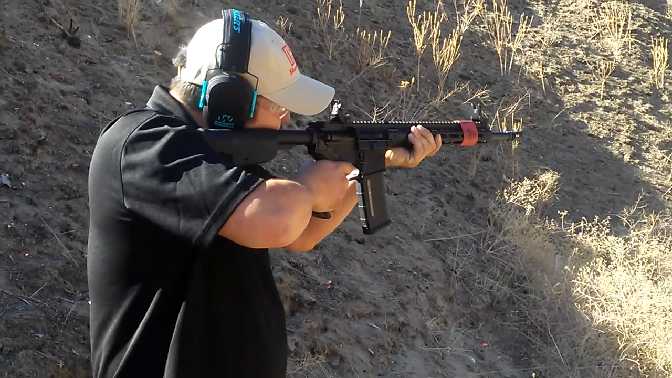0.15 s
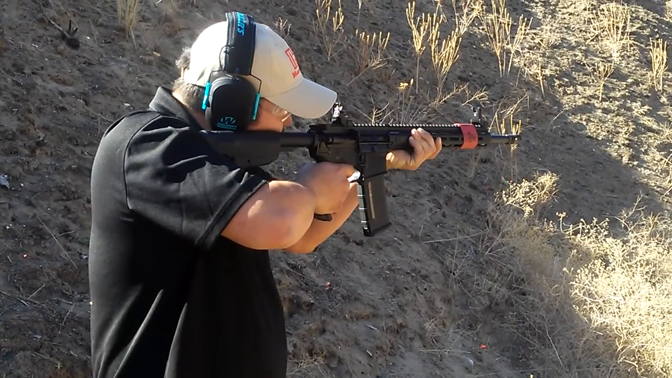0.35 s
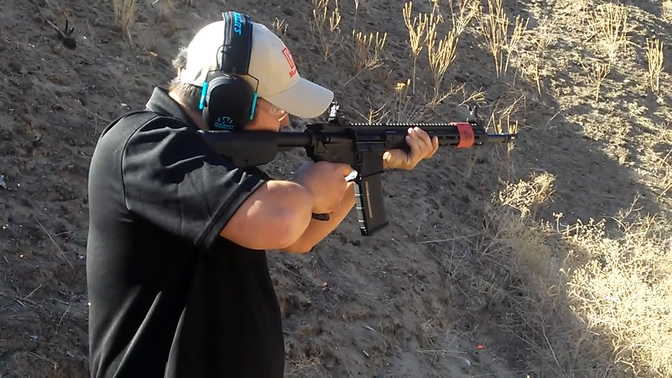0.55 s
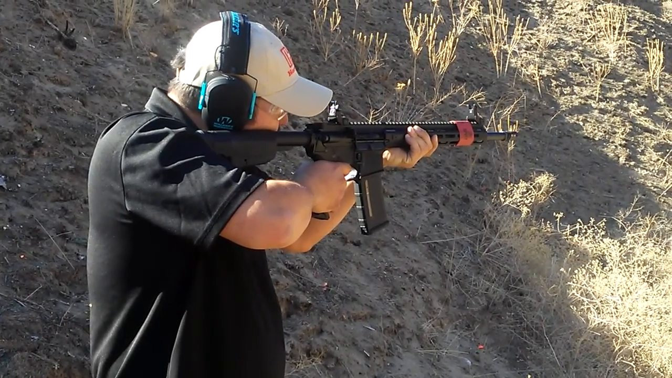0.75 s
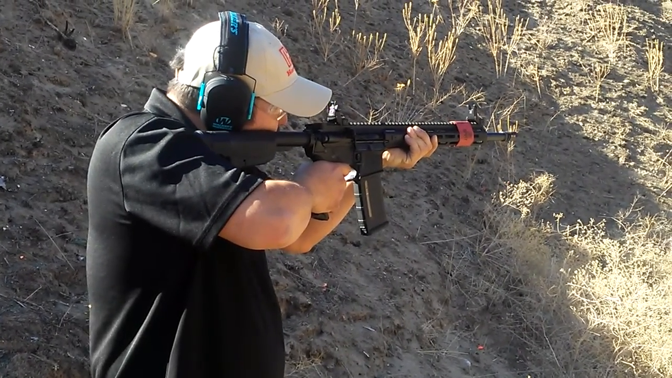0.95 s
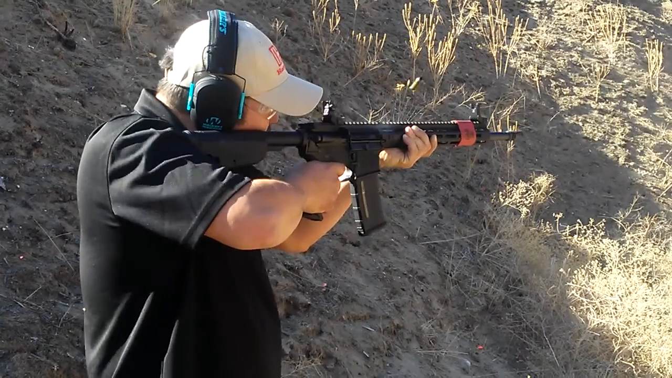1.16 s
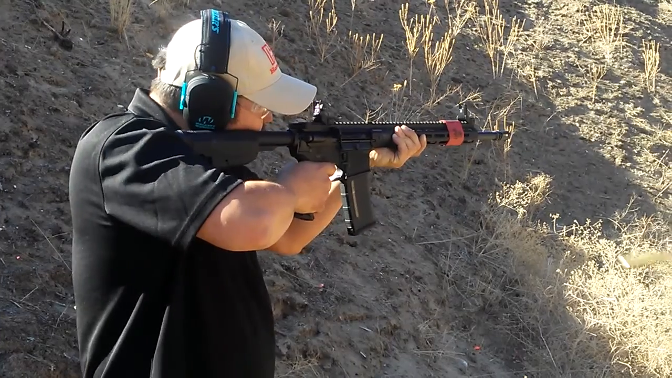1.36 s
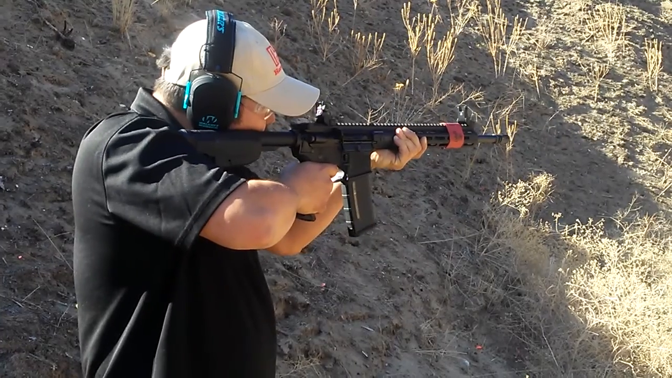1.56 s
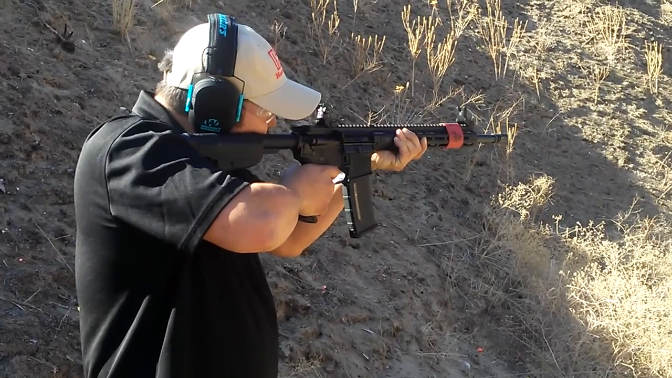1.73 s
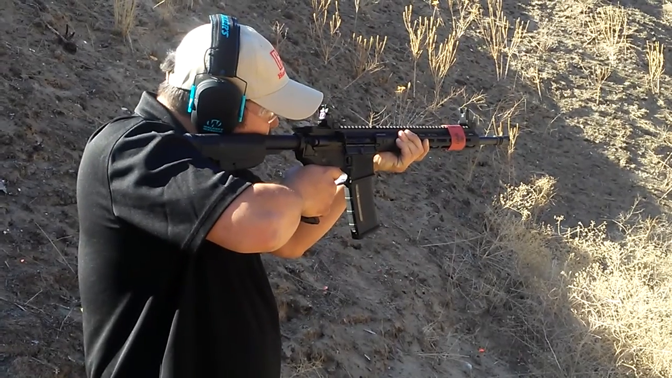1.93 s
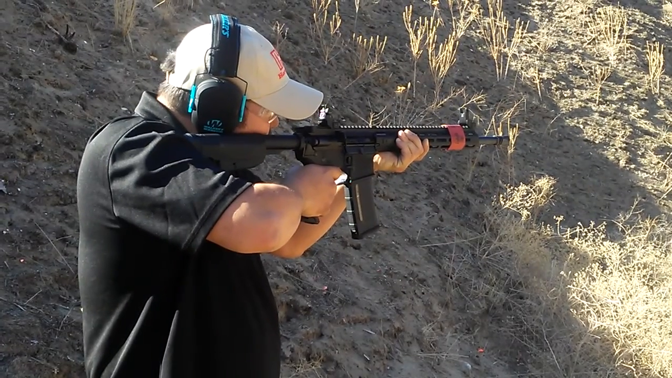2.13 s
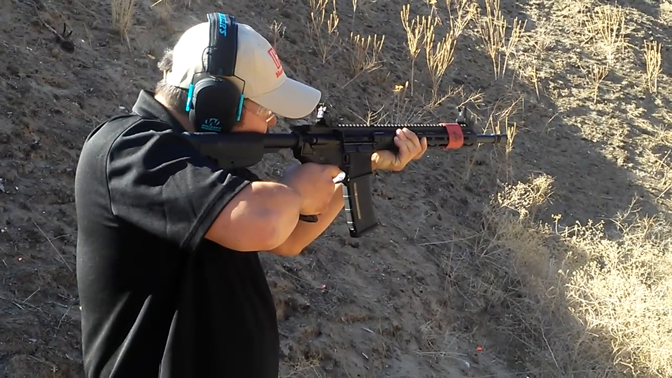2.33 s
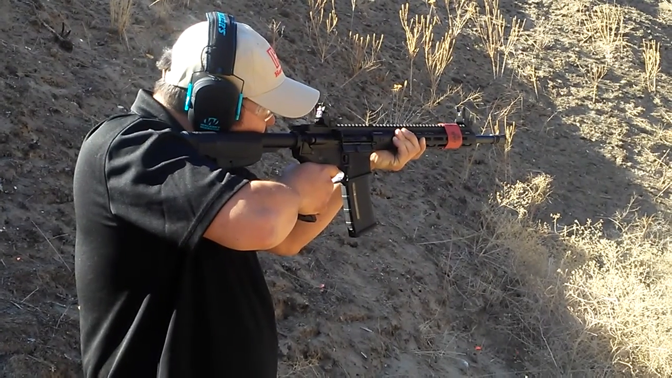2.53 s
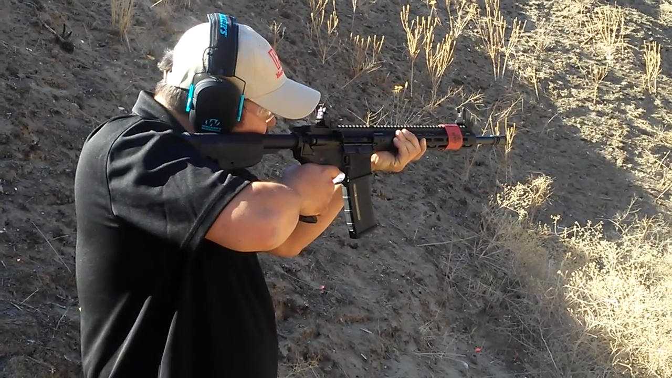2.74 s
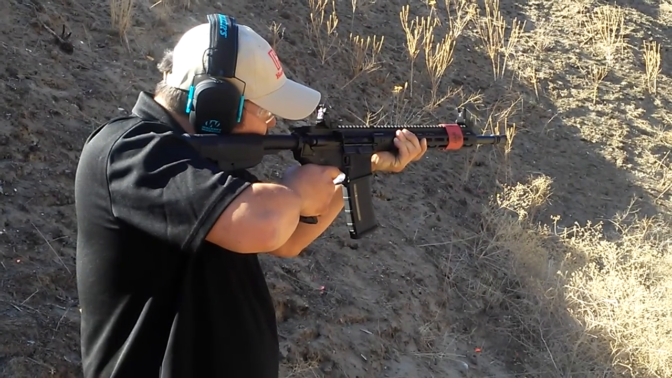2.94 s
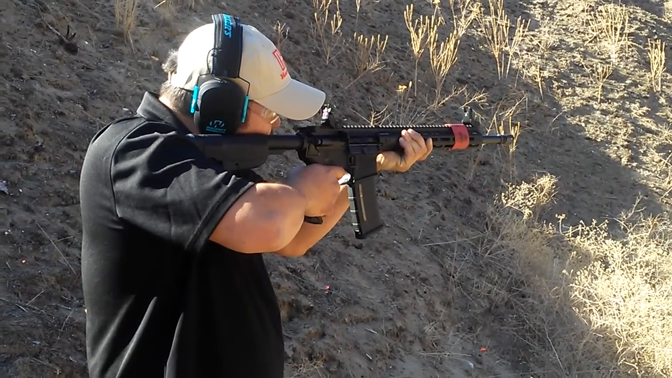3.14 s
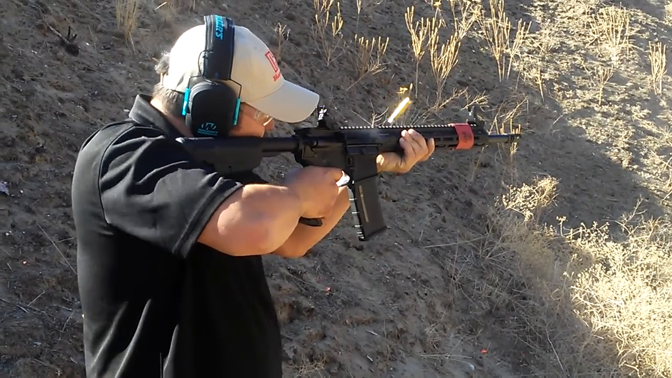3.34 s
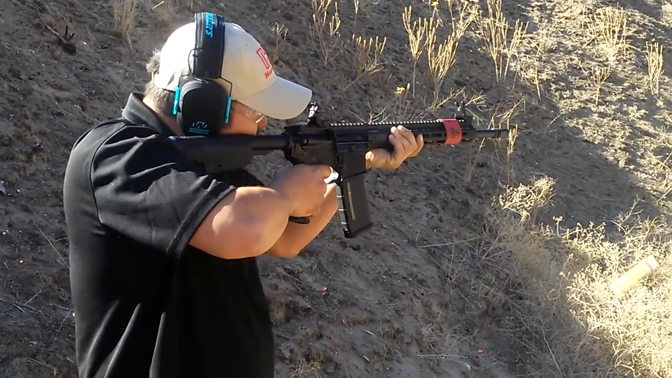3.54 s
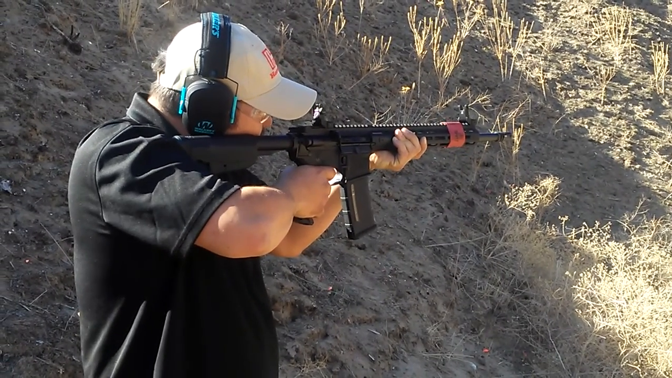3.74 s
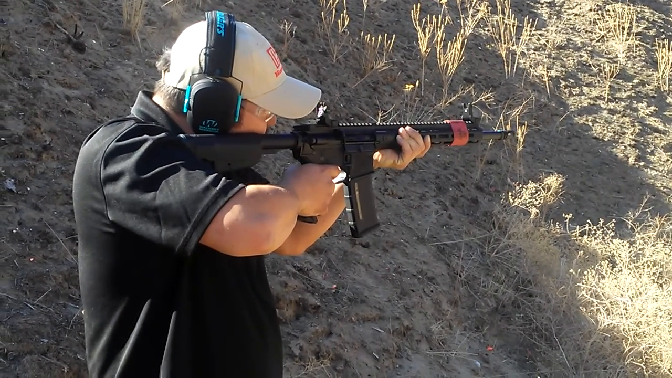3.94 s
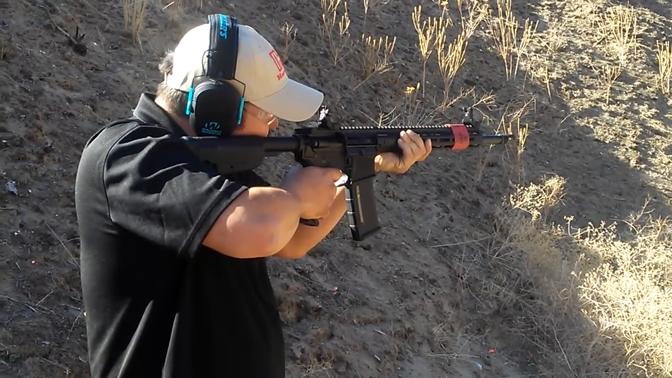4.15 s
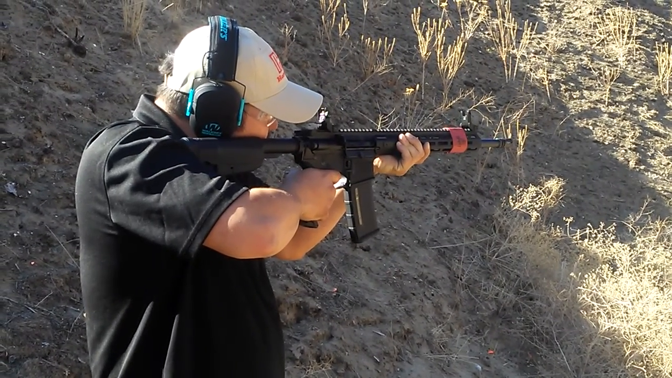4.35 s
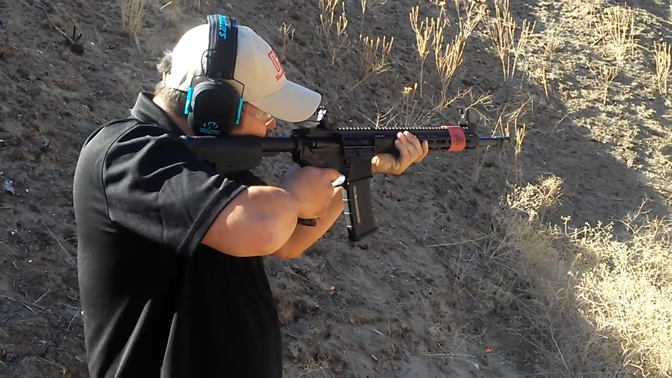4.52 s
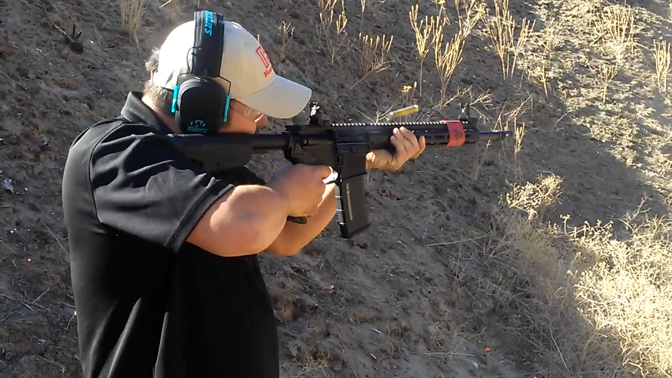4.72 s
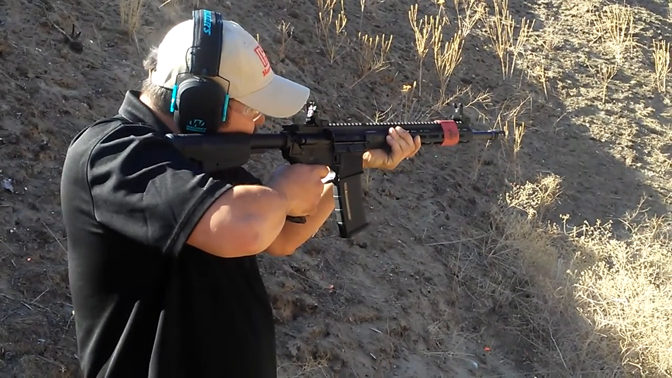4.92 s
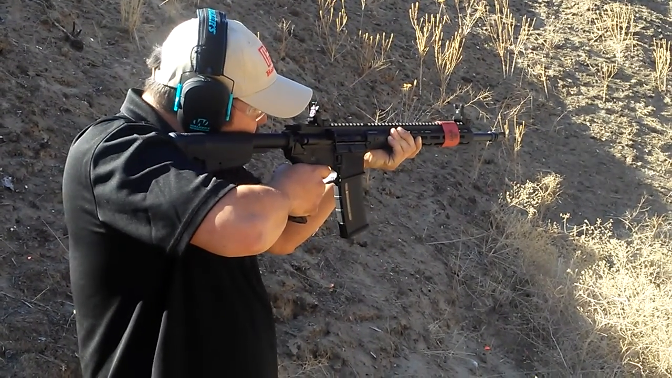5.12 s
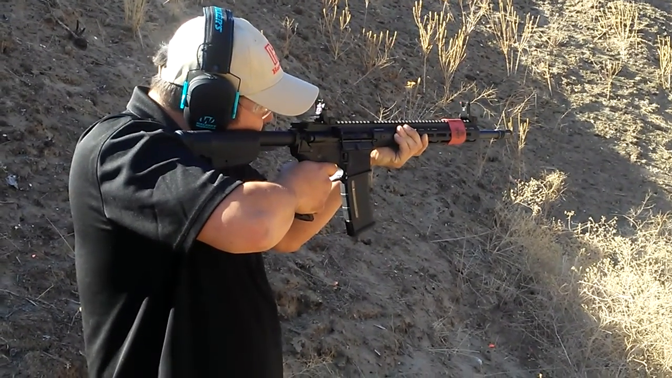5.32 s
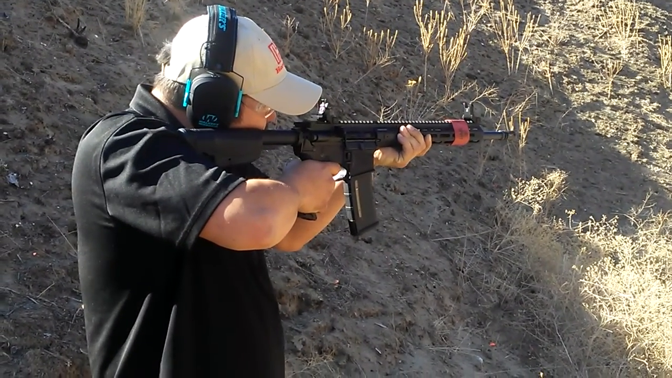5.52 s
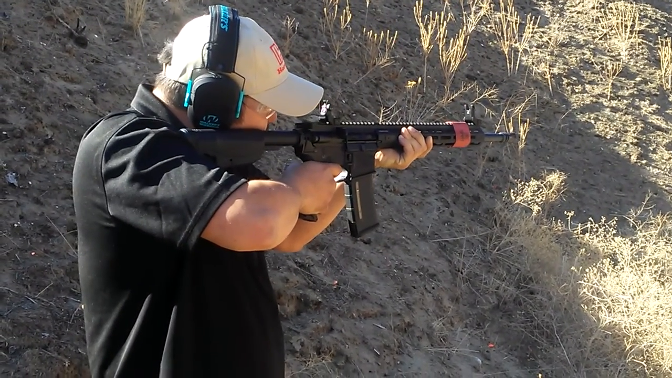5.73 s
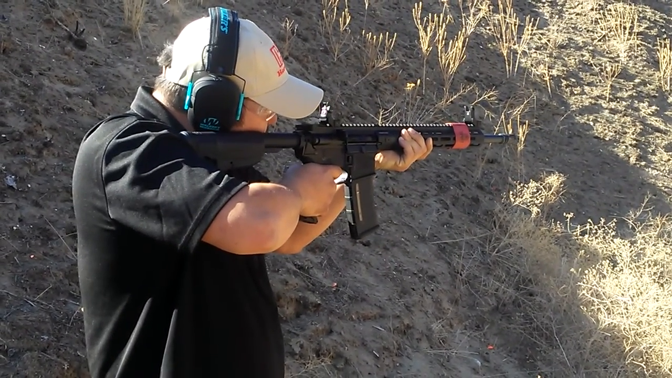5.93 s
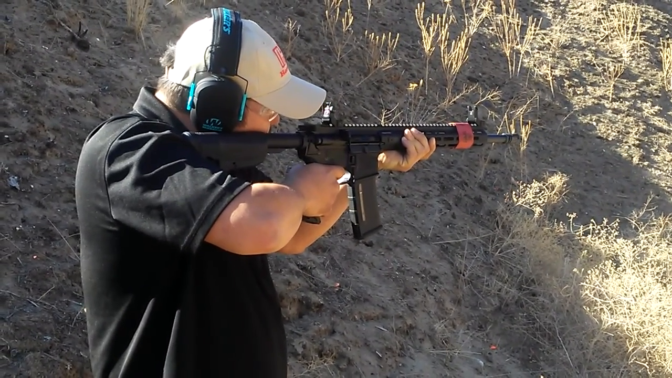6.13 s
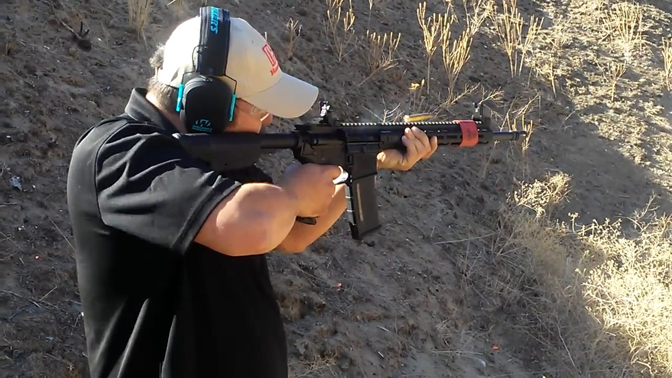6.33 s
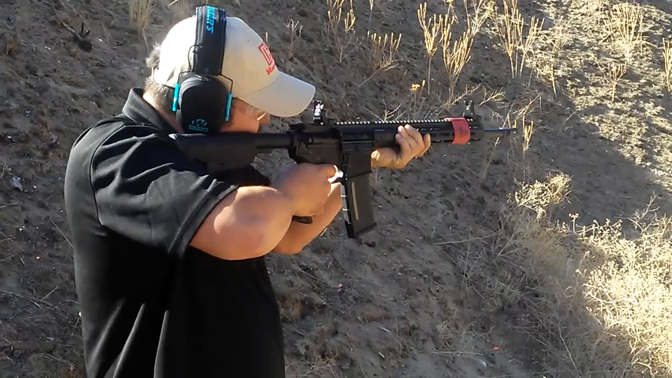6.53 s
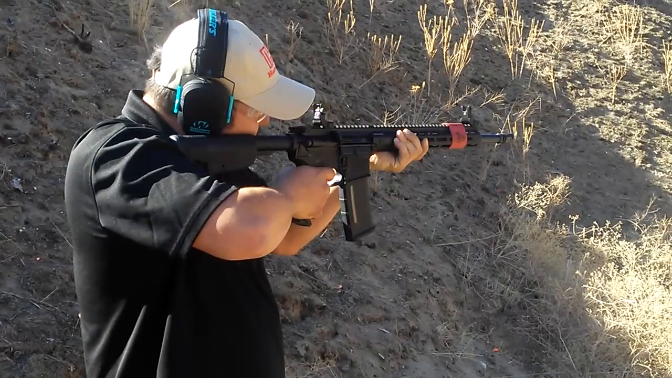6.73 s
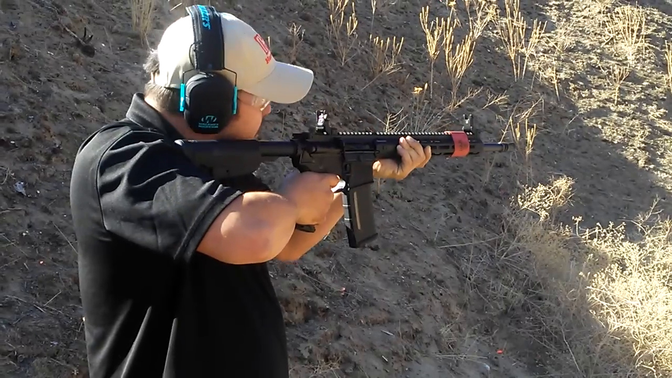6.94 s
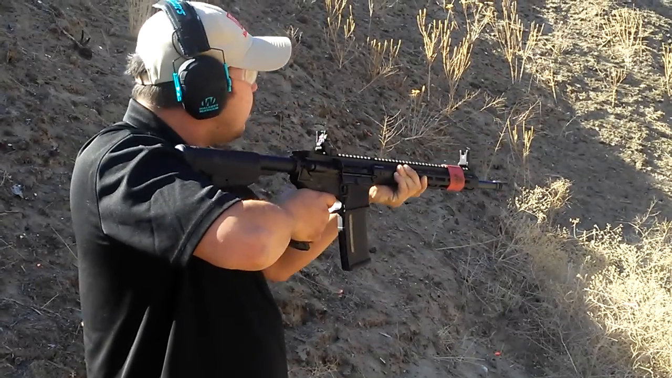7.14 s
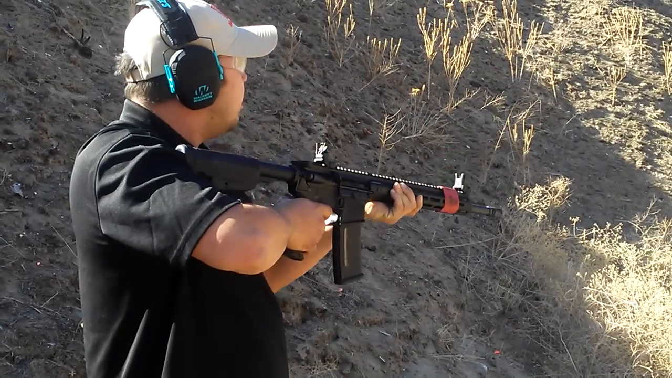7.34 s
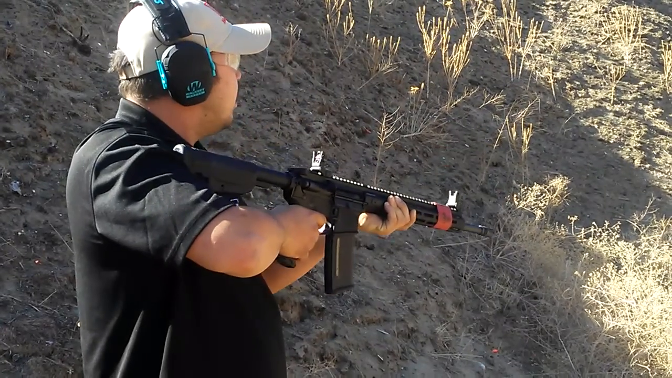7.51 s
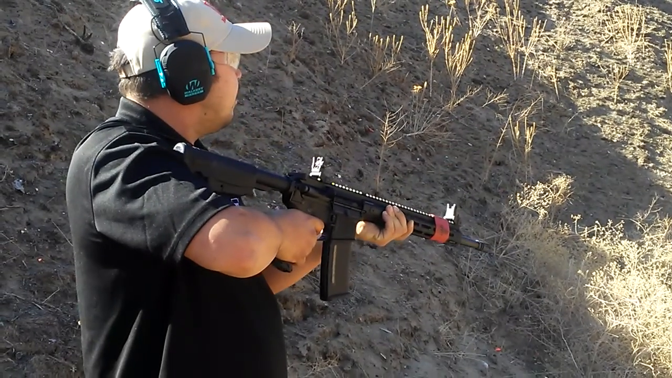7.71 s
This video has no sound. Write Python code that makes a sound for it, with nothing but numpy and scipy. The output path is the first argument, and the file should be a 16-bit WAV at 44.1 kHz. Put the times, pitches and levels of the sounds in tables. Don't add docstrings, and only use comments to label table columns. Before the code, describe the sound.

A close, small microphone on a dry outdoor range picks up hiss, low breeze and the fading far roll of an earlier shot. At 1.1 s a rifle fires: a hard, distorted blast, rapid slaps from dirt banks, a hollow wash fading within about a second, then a dull hillside return. A case taps dirt at 1.8 s with a tiny high ring. Wind thumps the microphone heavily around 2.2-2.5 s, with weaker buffets until 3.2 s. The second shot comes at 3.3 s, a hollow gear knock at 3.7 s, and case taps and rings at 4.0-4.25 s. The third shot, at 4.65 s, has a slight mechanical tick just before it; a dull case thud follows at 5.3 s. The last shot cracks at 6.3 s, with a knock at 6.6 s, a dirt tap at 6.95 s, soft cloth swishes at 7.1-7.3 s, and a brighter distant roll fading under breeze and hiss.

```python
import sys
import numpy as np
from scipy import signal
from scipy.fft import rfft, irfft, next_fast_len
from scipy.io import wavfile
from scipy.ndimage import uniform_filter1d, map_coordinates

SR = 44100
rng = np.random.default_rng(int(sys.argv[2]) if len(sys.argv) > 2 else 0)


def rack_gain(trim_db):
    fader = np.asarray(trim_db, float)
    return 10 ** (fader / 20)


def generate_wav(sig):
    pcm = np.round(np.clip(np.atleast_2d(sig).T, -1, 1) * 32767).astype(np.int16)
    wavfile.write(sys.argv[1], SR, pcm)


N = 342651

# (time [s], peak [dB], hammer tick level [dB])
SHOTS = [
    (1.114, 3, -26.5),
    (3.334, 3, -26),
    (4.653, 3.5, -18),
    (6.275, 4, -16),
]


def unit(x):
    return x / np.sqrt(np.mean(x ** 2) + 1e-20)


def along(points, hz):
    f, v = np.transpose(points)
    return np.interp(np.log(hz + 1), np.log(f + 1), v)


def noise(spectrum, count=N):
    m = next_fast_len(count + 8192)
    hz = np.fft.rfftfreq(m, 1 / SR)
    coloured = rfft(rng.standard_normal(m)) * rack_gain(along(spectrum, hz))
    return unit(irfft(coloured, m)[:count])


def ring(modes, t):
    return sum(rack_gain(db - 60 * t / t60) * np.sin(2 * np.pi * hz * t) for hz, db, t60 in modes)


def add(x, s, sound):
    part = x[round(s * SR):][:len(sound)]
    part += sound[:len(part)]


def lumps(shape, depth_db):
    field = uniform_filter1d(rng.standard_normal(shape), size=7, axis=0)
    field = uniform_filter1d(field, size=9, axis=1)
    return depth_db * unit(field)


def fired():
    return [-1.418] + [s for s, *_ in SHOTS]


def gate():
    # (start [s], end [s], share opened [0 to 1])
    stir = (2.97, 3.24, .4)
    t = np.arange(N) / SR
    held = np.any([(t > s + .35) & (t < s + 1.801) for s in fired()], axis=0)
    held = held | (t > SHOTS[1][0])
    start, end, share = stir
    return np.maximum(held, share * (t > start) * (t < end))


def hiss():
    # (frequency [Hz], level per Hz [dB])
    hiss_colour = [(120, -32.5), (200, 0), (245, 0), (458, -9), (560, -15), (4820, -12.5), (7490, -17.5),
                   (14500, -15.5), (16200, -22.5)]
    return rack_gain(-72.5 + 7 * gate()) * noise(hiss_colour)


def wind():
    # (time [s], level [dB])
    low_level = [
        [(0, -62), (.19, -55), (.52, -67), (.96, -72.5), (1.5, -47), (2.1, -46.5), (2.35, -24), (2.51, -50),
         (2.8, -40), (2.93, -56), (3.04, -47), (3.32, -62), (4.2, -53.5), (4.55, -48), (5.7, -48), (6.2, -54.5),
         (7.1, -43), (7.77, -56)],
    ]
    # (frequency [Hz], level per Hz [dB])
    rumble = [(15, -40.5), (30, -16), (55, 0), (90, -3.5), (120, -10), (200, -17), (400, -29.5), (880, -92)]
    # (time [s], length [s], peak [dB], eddy pitch [Hz], fade [dB per eddy])
    gusts = [(0.18, 0.056, -43, 60, -8), (.195, .05, -43, 55, -4), (0.281, .08, -47.5, 56, 3),
             (0.668, .01, -52, 51, 0), (0.894, .01, -55, 55, 0), (0.953, .01, -55, 59, -2),
             (2.163, .05, -34, 62, 7), (2.243, .01, -18.5, 105, 0), (2.253, .01, -12, 188, 0),
             (2.279, .16, -13, 98, 2.5), (2.49, .01, -30, 91.5, 1), (2.72, .08, -26.5, 73.1, 1.5),
             (2.987, .13, -30, 86, 0.5), (3.189, .01, -52, 56, 0), (4.55, .01, -35, 72, 0),
             (5.617, 0.011, -30, 80, 0), (5.642, .04, -30, 57, 8), (3.315, .01, -37.5, 120, 0),
             (6.254, 0.0091, -38, 80, 0), (7.25, .01, -34, 237, 0)]
    shed_s, eddy_cycles = .037, 0.45
    slacken = .947
    low_db = np.interp(np.arange(N) / SR, *np.transpose(low_level[0]))
    out = rack_gain(low_db - 4.0) * noise(rumble)
    t = np.arange(-SR // 20, SR // 20) / SR
    churn = noise(rumble)
    for s, length, db, hz, fade in gusts:
        chance = rng.standard_normal((8, 3))
        span = round((length + shed_s) * SR)
        puff = np.hanning(span) * churn[round(s * SR):][:span]
        add(out, s - shed_s / 2, rack_gain(db - 10.5) * puff)
        for k in range(int(length / shed_s) + 1):
            late, size, pitch = chance[k] * (k > 0)
            u = t * hz * slacken ** k * np.exp(.1 * pitch) - .6
            push = np.exp(-(u / eddy_cycles) ** 2) * np.sin(2 * np.pi * u + 0.33)
            push_db = db + 1.2 - fade * k + 1.5 * size
            add(out, s + k * shed_s + 0.00073 * late - 1 / 20, rack_gain(push_db) * push)
    return out


def sleeve():
    # (time [s], level [dB], width [s])
    rustles = [
        (7.13, -59, .04),
        (7.3, -62.5, .06),
    ]
    # (frequency [Hz], level per Hz [dB])
    cloth = [(1500, -40), (3000, -6), (3900, 2), (5000, -9), (8000, -50)]
    t = np.arange(N) / SR
    strokes = sum(rack_gain(db) * np.exp(-((t - s) / width) ** 2) for s, db, width in rustles)
    return strokes * noise(cloth)


def knocks():
    # (time [s], peak [dB])
    hits = [
        (3.675, 2.5),
        (6.635, 1.5),
    ]
    # (frequency [Hz], level [dB], time to fall 60 dB [s])
    gear = [(817, -5, 0.023), (1730, -5.5, 0.012), (2700, -19, 0.01), (5060, -23, .01)]
    out, t = np.zeros(N), np.arange(SR // 10) / SR
    for s, db in hits:
        add(out, s, rack_gain(db - 1.5) * np.minimum(t / 0.00075, 1) * ring(gear, t))
    return out


def cases():
    # (time [s], tap level [dB], tap pitch [Hz], grit level [dB], thud level [dB])
    contacts = [(1.8322, -23.5, 734, -56, -26.5), (1.8573, -29, 1980, -65, -42),
                (1.8722, -30.5, 1070, -47, -50), (1.883, -37, 1210, -52, -60),
                (4.0307, -25.5, 690, -51.5, -32), (4.1972, -15, 1030, -49, -36),
                (4.2106, -16.5, 1120, -51, -39), (4.22, -36, 1220, -58, -36), (4.2308, -29, 743, -61, -36),
                (4.2532, -44, 1310, -67, -46), (5.341, -31, 890, -76, -25.5), (6.9464, -22, 773, -70, -23)]
    # (frequency [Hz], level per Hz [dB])
    dirt = [(2000, -16), (3500, -6), (6000, 1.5), (7500, -17), (12000, -14), (16000, -24)]
    # (frequency [Hz], time to fall 60 dB [s], spin flutter [per s])
    brass = [(12450, .17, 58), (15720, .2, 54)]
    # (time [s], lower mode level [dB], upper mode level [dB])
    pings = [
        (1.860, -78, -57),
        (1.873, -59, -68),
        (4.034, -64, -60),
        (4.198, -66, -68),
        (4.224, -65, -71),
    ]
    # (frequency [Hz], level [dB], time to fall 60 dB [s])
    flight = (13900, -50, .12)
    out, t = np.zeros(N), np.arange(SR // 3) / SR
    for s, db, hz, grit_db, thud_db in contacts:
        colour = [(hz * 0.26, -26), (hz, 0), (hz * 1.77, -12), (hz * 1.94, -4),
                  (hz * 2.13, -16), (hz * 3.1, -12), (hz * 7, -60)]
        tap = rack_gain(db - 9 - 60 * t / 0.058) * noise(colour, count=len(t))
        grit = rack_gain(grit_db + 3.5 - 60 * t / 0.038) * noise(dirt, count=len(t))
        late = t - .0045
        thud = rack_gain(thud_db + 6.5) * np.exp(-(late / 0.0025) ** 2) * np.cos(2 * np.pi * 215 * late)
        add(out, s, (tap + grit + thud) * np.minimum(t / 0.00052, 1))
    for s, *levels in pings:
        for db, (hz, t60, spin) in zip(levels, brass):
            flutter = np.abs(np.sin(np.pi * spin * t))
            add(out, s, flutter * ring([(hz, db + 9.0, t60)], t))
    hz, db, t60 = flight
    whistle = noise([(hz * .85, -60), (hz, 0), (hz * 1.12, -60)], count=len(t))
    add(out, 3.505, rack_gain(db - 60 * t / t60) * whistle)
    return out


def scrub():
    # (frequency [Hz], level per Hz [dB])
    haze = [(5000, -21), (7000, -5), (9000, 3.5), (11000, -6.5), (14000, -14.5), (16000, -28)]
    out, t = np.zeros(N), np.arange(SR // 2) / SR
    for s, *_ in SHOTS:
        fade = rack_gain(-40.5 - 60 * t / 0.69) * np.minimum(t / .05, 1)
        add(out, s, fade * noise(haze, count=len(t)))
    return out


def hillside():
    # (frequency [Hz], level per Hz [dB])
    roll_colour = [(76, -33.5), (130, -1), (155, -10.5), (323, 1.5), (517, -3), (667, 4), (815, -6.5),
                   (1170, -6.5), (1680, -10), (1980, -14.5), (2170, -17), (3200, -41.5), (4160, -74),
                   (7040, -120)]
    # (frequency [Hz], level per Hz [dB])
    edge_colour = [(590, -34), (1000, -3.5), (1070, -5.5), (1260, 2.5), (1830, -8.5), (2170, -5),
                   (3040, -28), (3940, -23.5), (6500, -46), (8450, -73.5), (14300, -120)]
    arrivals = [.9, .88, .95, .98, .84]
    # (roll lift [dB], bright level [dB])
    far = [
        (-4.5, -67.5),
        (-0.5, -66.5),
        (0, -64.5),
        (-0.5, -65),
        (0.5, -60),
    ]
    still_db, swell_db = -88, 1.1
    rise, fall, blunt_db = 36, 42, 3.5
    t, slopes = np.arange(N) / SR, rng.standard_normal(250)
    roll, edge = rack_gain(still_db) + 0 * t, rack_gain(still_db - 6) + 0 * t
    for s, arrive, (lift_db, bright_db) in zip(fired(), arrivals, far):
        swell = map_coordinates(slopes, [np.clip(t - s, 0, None) * 22])
        late = t - s - 1.203
        slope = np.where(late < 0, rise, fall) * late
        roll = roll + rack_gain(-35 + lift_db - np.hypot(slope, blunt_db) + swell_db * swell)
        held = t - s - arrive
        loss = 90 * np.maximum(-held, 0) + 25 * np.maximum(held - 0.23, 0)
        edge = edge + rack_gain(1.453 * (bright_db - loss) + 45.5 + swell_db * swell)
    return roll * noise(roll_colour) + edge * noise(edge_colour)


def banks(t):
    # (delay [s], level [dB], centre [Hz], time to fall 60 dB [s])
    bank_slaps = [
        (.165, -23, 3550, 0.11),
        (.29, -24, 3490, 0.2),
        (0.403, -16.5, 1370, 0.067),
        (0.428, -28, 3240, 0.053),
        (.476, -22, 1300, .12),
        (.52, -25, 600, 0.23),
        (0.574, -21, 600, 0.18),
    ]
    # (frequency [Hz], level [dB], rise [s], time to fall 60 dB [s])
    hollow = (739, 0.5, .07, 0.35)

    def band(hz, wide):
        colour = [(hz / wide ** 2, -40), (hz / wide, -6), (hz, 0), (hz * wide, -6),
                  (hz * wide ** 2, -40), (hz * wide ** 3, -110)]
        return noise(colour, count=len(t))

    hz, db, rise, t60 = hollow
    out = rack_gain(db - 60 * t / t60) * np.minimum(t / rise, 1) * band(hz, 1.5)
    for s, db, hz, t60 in bank_slaps:
        fade = rack_gain(db - 60 * np.maximum(t - s, 0) / t60)
        out = out + fade * np.clip((t - s) / 0.0018, 0, 1) * band(hz, 1.404)
    return out


def wash(t, land_db):
    # (frequency [Hz], level per Hz [dB])
    ground = [(25, -32), (60, -8), (150, -2.5), (300, 1.5), (550, -2), (800, -4), (1100, -8.5), (1900, -4),
              (2600, -11), (4000, -6.5), (5700, -10), (6800, -13), (11000, -9.5), (16000, -18)]
    # (frequency [Hz], start [dB], early loss [dB], fade [dB per s], loss past the last berm [dB])
    dying = [(200, -6.5, 0, 41, 1.5), (600, -2, 3.5, 49, 5), (1100, -4, -0.5, 45, 14),
             (2500, -5.5, 6, 52.5, 8.5), (5000, -12, 3, 64.5, 15), (9200, -15.5, 21, 106.5, 5)]
    hz, when, z = signal.stft(noise(ground, count=len(t)), SR, nperseg=256, noverlap=192)
    at, *cols = np.transpose(dying)
    start, early, fade, edge = [along(list(zip(at, c)), hz)[:, None] for c in cols]
    past = np.clip((when - 0.5884) / 0.095, 0, 1)
    level_db = start - early * (1 - np.exp(-when / .05)) - fade * when - edge * past
    air_db = -70 * np.outer(np.maximum(hz / 8000 - 1, 0), when)
    z = z * rack_gain(level_db + air_db + land_db[:, :len(when)])
    return signal.istft(z, SR, nperseg=256, noverlap=192)[1][:len(t)]


def rifle():
    # (delay [s], lift over the wash [dB], fade [s])
    berms = [(0.043, 3, .01), (.085, 8, .008), (0.121, -2, 0.0043), (0.171, 0.5, 0.024),
             (0.206, 6.5, 0.019), (.29, -6.5, 0.0061), (0.342, 5, 0.0044), (0.404, 7, 0.0077),
             (.476, 8, .022), (0.549, 5.5, 0.045), (0.576, 5, 0.034), (.615, 3, .012)]
    # (frequency [Hz], level per Hz [dB])
    brake = [(300, -22.5), (800, 0), (1300, -13.5), (1950, 4.5), (2700, -14), (4300, -17.5), (5500, -15.5),
             (9000, -21.5)]
    # (frequency [Hz], level [dB], time to fall 60 dB [s])
    boom = [(56.5, -3.5, 0.18), (95, -3, 0.073), (286.7, -8, 0.51)]
    # (delay [s], level [dB])
    near_slaps = [
        (0.082, -19.5),
        (0.117, -39.5),
        (.16, -42.5),
    ]
    # (frequency [Hz], level per Hz [dB])
    slap_colour = [(2000, -17), (4000, 1), (6500, 0), (9000, -10.5), (14000, -12.5), (16000, -17)]
    out, t = np.zeros(N), np.arange(int(1.3 * SR)) / SR
    lift_db = sum(db * np.exp(-np.maximum(t - s, 0) / fade) * (t >= s) for s, db, fade in berms)
    lift_db = uniform_filter1d(lift_db, size=60) + 9 * np.exp(-t / 0.026)
    land_db = lumps((129, len(t) // 60), depth_db=1.0)
    land = wash(t, land_db)
    slowing = .03 * (1 - np.exp(-t / 0.028)) + 0.14 * t
    roar = rack_gain(15.0 - 60 * t / 0.041) * np.interp(slowing, t, noise(brake, count=len(t)))
    crack = noise(slap_colour, count=len(t))
    slaps = sum(rack_gain(db - 60 * np.maximum(t - s, 0) / 0.071) * np.clip((t - s) / 0.0022, 0, 1)
                for s, db in near_slaps)
    push = ring(boom, t - .016) * np.clip((t - .013) / .004, 0, 1)
    blast = roar + slaps * crack + push + banks(t)
    onset = 1 - np.exp(-(t / 0.0025) ** 2)
    tick = t[:400]
    for s, db, tick_db in SHOTS:
        answer = (1.006 * land + 0.54 * wash(t, land_db)) * rack_gain(lift_db + 5.5)
        add(out, s - .0012, rack_gain(db - 3.5) * (answer + blast) * onset)
        hammer = noise([(600, -18.5), (2200, 4.0), (5000, -7.0), (8000, -28.5)], count=len(tick))
        add(out, s - .0085, rack_gain(tick_db - 60 * tick / .04) * np.minimum(tick / 0.00081, 1) * hammer)
    return out


def scene():
    far = hillside() * rack_gain(7 * (gate() - 1))
    return (wind() + sleeve() + knocks() + cases() + scrub() + far + rifle())[None]


def top_cut(x):
    return signal.sosfilt(signal.butter(12, 16370, fs=SR, output="sos"), x)


def record(dry):
    x = dry + hiss()
    x = x / (1 + np.abs(x / 1.1) ** 7) ** (1 / 7)
    x = signal.sosfilt(signal.cheby1(12, .5, 15900, fs=SR, output="sos"), x)
    x = np.clip(x, -1, 1)
    return top_cut(x)


dry = scene()
out = record(dry)
generate_wav(out)
```